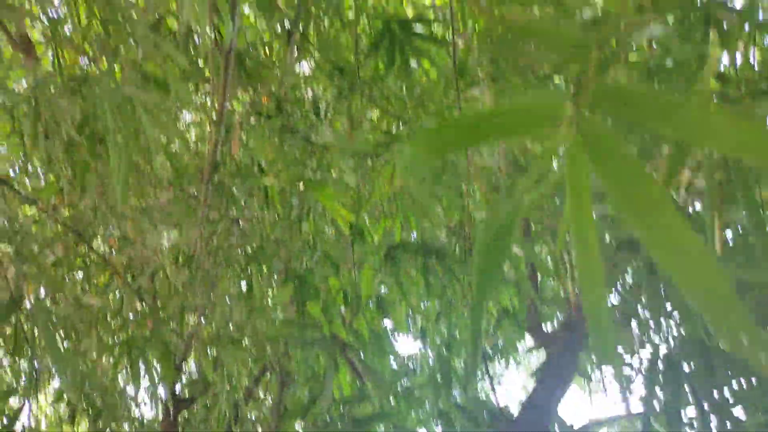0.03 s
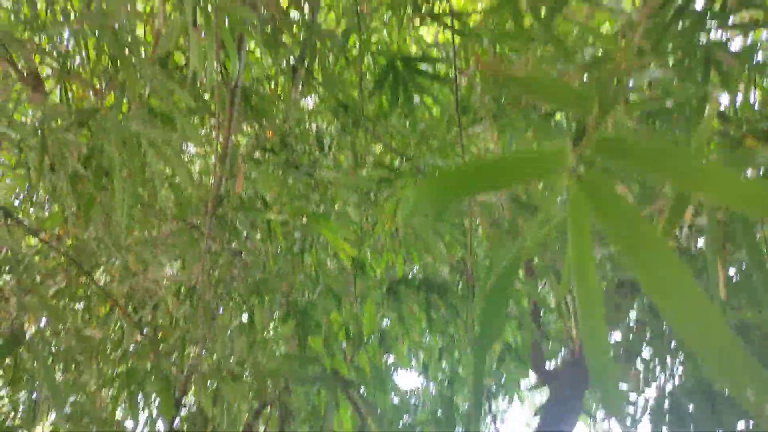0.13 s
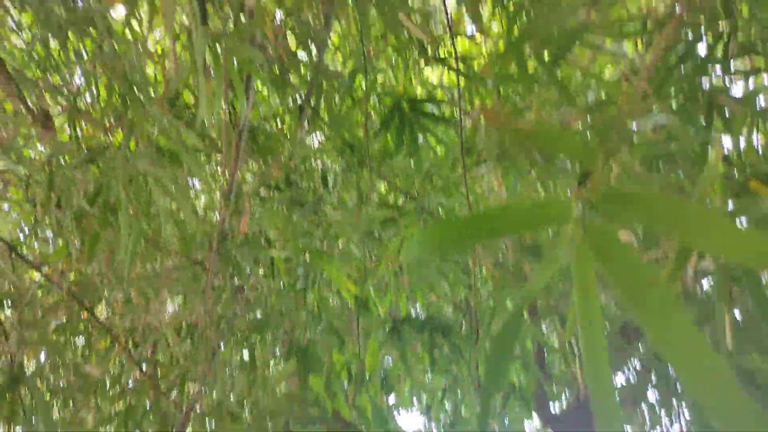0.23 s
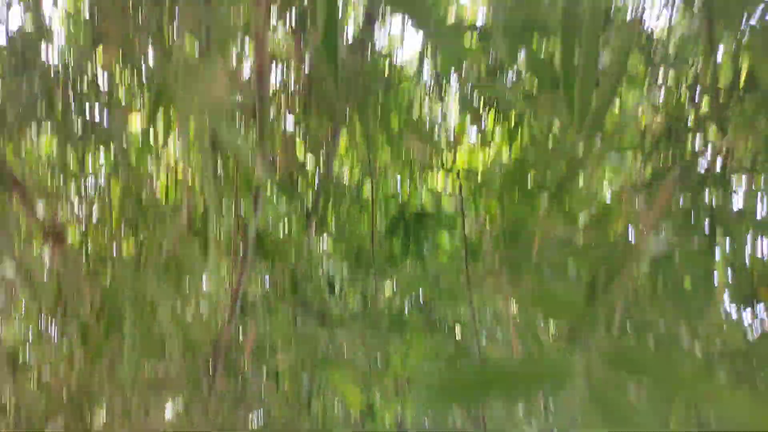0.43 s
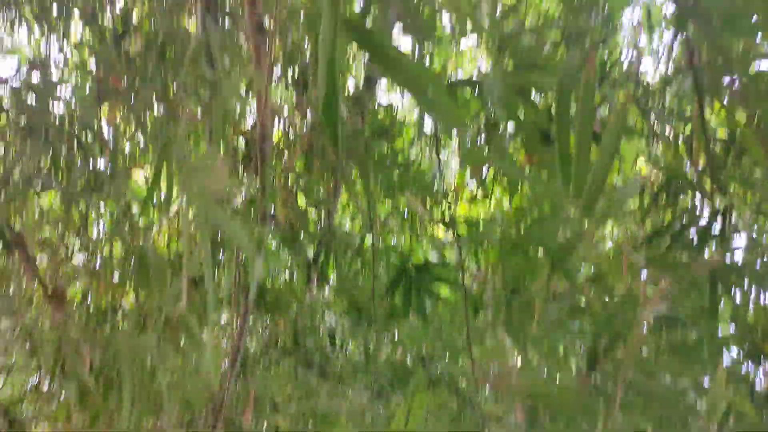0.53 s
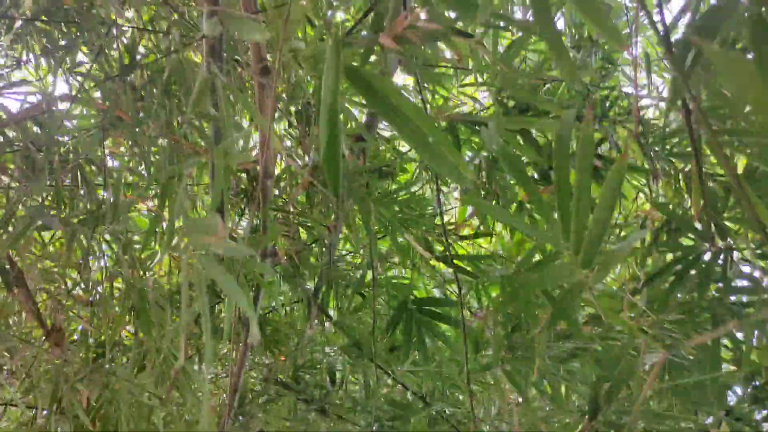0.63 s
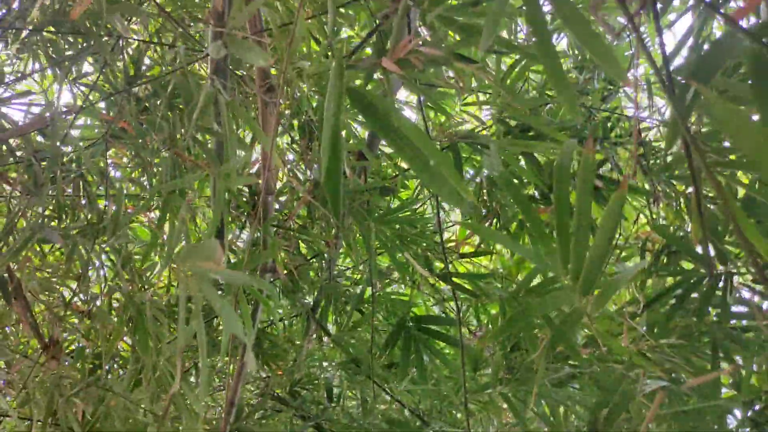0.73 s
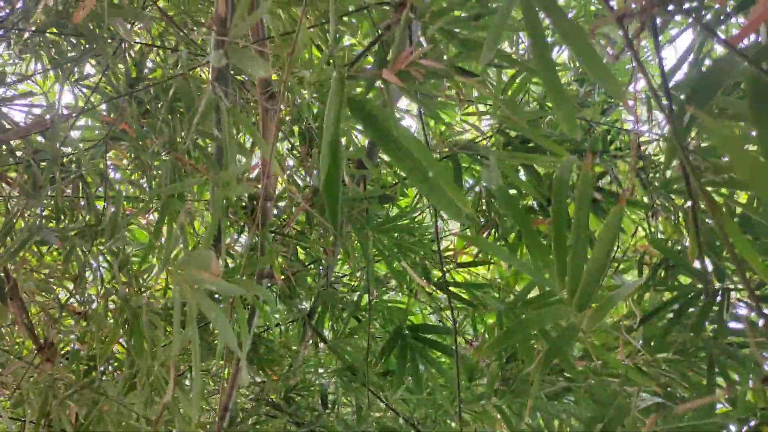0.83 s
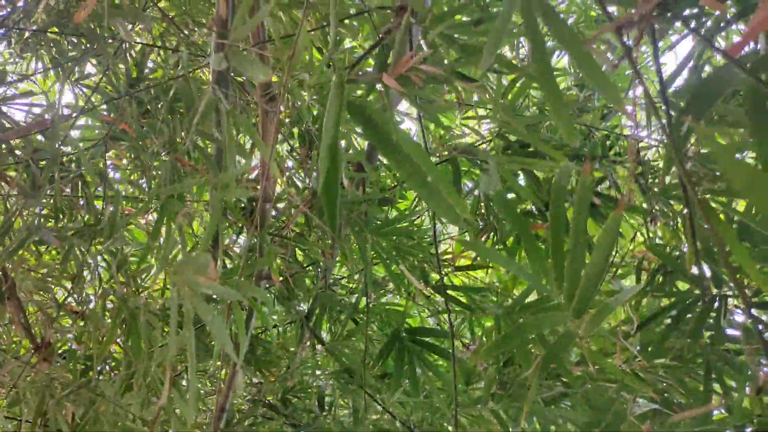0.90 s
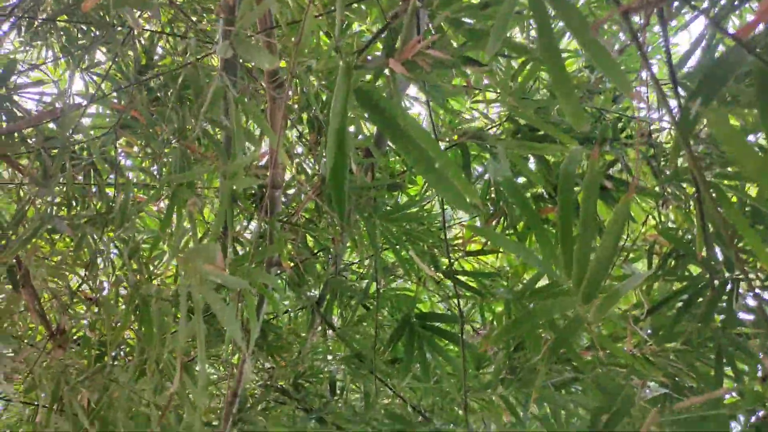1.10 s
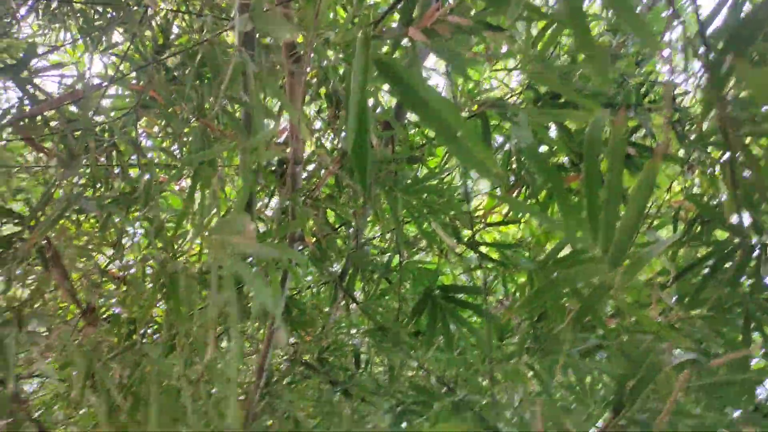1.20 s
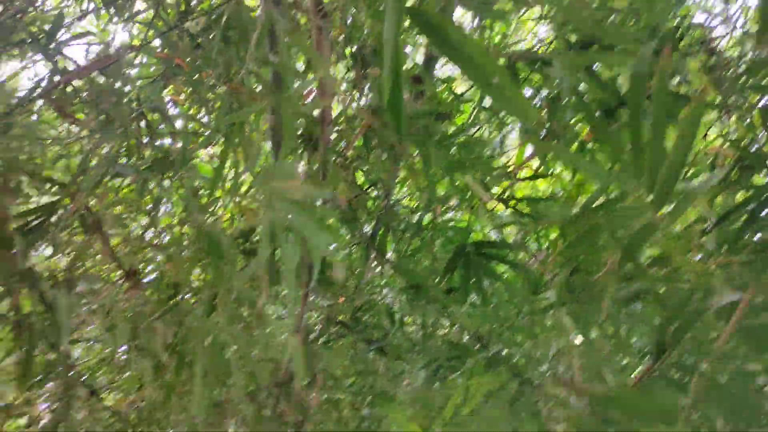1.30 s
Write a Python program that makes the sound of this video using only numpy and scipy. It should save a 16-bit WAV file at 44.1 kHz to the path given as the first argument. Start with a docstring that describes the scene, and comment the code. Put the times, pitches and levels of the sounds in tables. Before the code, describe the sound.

A soft rustle of leaves in a breeze, broken twice by a handled camera clicking.

```python
"""Bamboo leaves hiss as they brush together in a light wind, over a weak rumble and creaking stems.
A hand-held camera is tilted and its case knocks: a scuff, a soft thud, a hard click and a rattle of
contacts that ring its modes. The leaves swell and a faint low hum begins to come and go. As the hiss
sinks, a few dry leaves tick and the stems creak again. Then the case knocks a second time, and the
leaves swell once more and fade."""
import sys
import numpy as np
from scipy.fft import rfft, irfft, next_fast_len
from scipy.io import wavfile
from scipy.ndimage import map_coordinates

SR = 44100
rng = np.random.default_rng(int(sys.argv[2]) if len(sys.argv) > 2 else 0)


def master(y):
    """Save y as 16-bit WAV."""
    cut = np.clip(np.atleast_2d(y).T, -1, 1)
    pcm = np.round(cut * 32767)  # scale
    wavfile.write(sys.argv[1], SR, pcm.astype(np.int16))


N = 59535
T = np.arange(N) / SR


def amp(db):
    """The decibel scale: amplitude grows tenfold for every 20 dB."""
    return 10 ** (np.asarray(db) / 20)


def filtered(x, response):
    """Linear filtering: the spectrum of x is multiplied by a frequency response."""
    size = next_fast_len(N + 8192)
    return irfft(rfft(x, size) * response(np.fft.rfftfreq(size, 1 / SR)), size)[:N]


def noise(spectrum):
    """Spectral shaping: white noise takes on a (Hz, relative dB) colour and is scaled to rms 1."""
    knot_hz, db = np.transpose(spectrum)
    white = rng.standard_normal(N)
    coloured = filtered(white, lambda hz: amp(np.interp(np.log(hz + 1), np.log(knot_hz), db)))
    return coloured / coloured.std()


def curves(rows):
    """Linear interpolation: each column after the time becomes one value per sample."""
    times, *columns = np.transpose(rows)
    return [np.interp(T, times, column) for column in columns]


def envelope(start, length, rise, t60):
    """Exponential decay: a smooth onset is held until start + length, then falls 60 dB in t60 seconds."""
    age = np.maximum(T - start, 0)
    onset = 1 - np.exp(-(age / rise) ** 2.2)
    return onset * np.exp(-np.log(1000) * np.maximum(age - length, 0) / t60)


def pulse(start, length):
    """A raised-cosine window: one smooth push."""
    return np.sin(np.pi * np.clip((T - start) / length, 0, 1)) ** 2


def swells(rows, spectrum):
    """Amplitude modulation: coloured noise swells once for each row."""
    gain = sum(amp(db) * envelope(start, length, rise, t60) for start, length, db, rise, t60 in rows)
    return gain * noise(spectrum)


# The leaves' loudness, in four stretches. Each row: time in seconds, hiss and mid rustle levels in dB.
LEAF_LEVELS = [
    [(0.0, -46.5, -56.5), (0.024, -47.5, -54.5), (0.07, -50, -56), (0.15, -53.5, -59.5),
     (0.215, -46.5, -52.5)],
    [(0.29, -43.5, -48.5), (0.368, -48, -56), (0.668, -57.5, -64), (0.684, -60, -68), (0.72, -62, -78)],
    [(0.78, -61, -86.5), (0.782, -60, -86.5), (0.818, -59.5, -85), (0.836, -55.5, -66.5), (0.93, -46, -53)],
    [(1.05, -45, -51), (1.228, -57, -62.5), (1.242, -60, -66.5), (1.25, -59, -66.5), (1.35, -61.5, -80)],
]
# The loudness of their lowest band. Each row: time in seconds, level in dB.
LOW_RUSTLE_LEVELS = [(0, -66.5), (.1, -66), (.15, -90), (.21, -62.5), (.25, -55), (.3, -54), (.38, -61),
                     (.5, -65.5), (.62, -92), (.67, -76), (.73, -93), (.82, -88), (.87, -65.5), (.93, -59),
                     (1.02, -56.5), (1.12, -59.5), (1.22, -71.5), (1.3, -98.5)]
# The spectra of the three bands. Each row: frequency in Hz, relative level in dB.
HISS_SPECTRUM = [(3000, -47), (4100, -9.5), (5000, -3.5), (5500, -1.5), (6100, -6), (6900, 0), (7450, 1.5),
                 (7750, -5), (8000, -18.5), (8300, -18.5), (8600, -40.5)]
MID_RUSTLE_SPECTRUM = [(1750, -48.5), (2050, -17.5), (2300, -3), (2800, 3.5), (3400, 0.5), (4000, -2),
                       (4800, -27), (6000, -40)]
LOW_RUSTLE_SPECTRUM = [(950, -57.5), (1150, -19), (1350, -9.5), (1630, -4.5), (1930, -6), (2400, -3),
                       (3200, -52.5)]
def leaves(flutter_db=1.14, knots_per_s=260):
    """Friction noise: leaves brush each other, giving three bands that share one fast random grain."""
    hiss_db, mid_db = curves(np.vstack(LEAF_LEVELS))
    low_db, = curves(LOW_RUSTLE_LEVELS)
    hiss = amp(hiss_db) * noise(HISS_SPECTRUM)
    mid = amp(mid_db) * noise(MID_RUSTLE_SPECTRUM)
    low = amp(low_db) * noise(LOW_RUSTLE_SPECTRUM)
    grain = map_coordinates(rng.standard_normal(N), [T * knots_per_s])  # smooth random curve
    return (hiss + mid + low) * amp(flutter_db * grain)


# Swells of the rumble. Each row: start and length in seconds, level in dB, rise and t60 in seconds.
RUMBLE_SWELLS = [(-.02, 0.043, -62, 0.011, .55), (.985, 0.032, -63, 0.0091, .2),
                 (1.3, .05, -63.5, 0.0098, .2)]
# The spectra of the rumble and the steady floor. Each row: frequency in Hz, relative level in dB.
RUMBLE_SPECTRUM = [(20, -23), (55, -14), (90, 1), (135, -5.5), (200, -15.5), (400, -55), (900, -73.5)]
FLOOR_SPECTRUM = [(20, -9), (80, 2.5), (160, -6.5), (350, -8), (600, -17.5), (2000, -23), (8000, -26)]
def rumble(floor_db=-77.5):
    """Low-frequency noise: a weak band near 90 Hz swells three times over a stationary floor."""
    return swells(RUMBLE_SWELLS, RUMBLE_SPECTRUM) + amp(floor_db) * noise(FLOOR_SPECTRUM)


# Creaks of the stems. Each row: start and length in seconds, pitch in Hz,
# half-width as a share of the pitch, level in dB.
STEM_CREAKS = [(-.01, 0.083, 1070, .22, -70), (-.01, .19, 1563, 0.15, -71),
               (0.546, 0.0034, 1690, 0.094, -65.5), (0.633, 0.0042, 1410, .15, -59.5),
               (0.656, 0.042, 1350, .18, -77), (0.756, 0.047, 1254, 0.18, -79),
               (0.833, 0.0098, 1580, .12, -71), (1.232, 0.051, 1750, 0.086, -75.5)]
def creaks(rise_s=0.0024, t60_s=0.073):
    """Resonance driven by friction: stems rub together and sound one narrow band of noise each."""
    out = np.zeros(N)
    for start, length, pitch, width, db in STEM_CREAKS:
        friction = rng.standard_normal(N)
        band = filtered(friction, lambda hz: 1 / (1 + ((hz / pitch - 1) / width) ** 2) ** 2)
        out += amp(db) * envelope(start, length, rise_s, t60_s) * band / band.std()
    return out


# Scuffs of the case. Each row: start and length in seconds, level in dB, rise and t60 in seconds.
CASE_SCUFFS = [(.222, 0.047, -56, 0.0044, 0.28), (.89, 0.099, -58.5, 0.032, 0.35),
               (.988, 0.0081, -54, 0.002, 0.21), (1.04, .05, -66.5, 0.0185, .2)]
# The spectrum of a scuff. Each row: frequency in Hz, relative level in dB.
SCUFF_SPECTRUM = [(100, -23.5), (300, -3), (520, -4.5), (720, 4.5), (1000, -2.5), (1400, -1.5), (2500, -36)]
def scuffs():
    """Sliding friction: the handled case gives short swells of noise around each knock."""
    return swells(CASE_SCUFFS, SCUFF_SPECTRUM)


# The hollow low note of the case. Each row: start in seconds, level in dB.
CASE_THUDS = [(0.223, -50), (0.987, -61.5)]
def thuds(pitch_hz=350, hold_s=0.024, rise_s=0.0097, t60_s=0.11):
    """Body resonance: the case booms softly in one damped mode under each rattle."""
    out = np.zeros(N)
    for start, db in CASE_THUDS:
        tone = np.sin(2 * np.pi * pitch_hz * (T - start))
        out += amp(db) * envelope(start, hold_s, rise_s, t60_s) * tone
    return out


# The modes of the case. Each row: frequency in Hz at pitch ratio 1, relative level in dB, t60 in seconds.
CASE_MODES = [(1756, -27, 0.019), (2000, -25.5, 0.1), (2340, -20, 0.016), (2603, -11.5, 0.092),
              (2977, -20.5, 0.044), (3060, -28.5, .05), (3260, -23, 0.045), (4600, -38.5, .015)]
def case_ring(start, pitch_ratio, rise_s=0.00061):
    """Modal vibration: the struck case rings as a sum of damped sinusoids of random phase."""
    out = np.zeros(N)
    for hz, db, t60 in CASE_MODES:
        phase = 2 * np.pi * hz * pitch_ratio * (T - start) + rng.uniform(0, 2 * np.pi)
        out += amp(db) * envelope(start, 0, rise_s, t60) * np.sin(phase)
    return out


# Contacts of the case. Each row: start in seconds, level in dB, pitch ratio,
# then the relative levels of ring, rasp and snap in dB.
CASE_CONTACTS = [(0.2252, -9.5, 1, -2, -23.5, -23), (0.243, -12, 1.002, -4, -24, -16.5),
                 (0.2484, -31.5, 0.68, 3, -1, -24), (0.2536, -24.5, .98, 2, -9, -18),
                 (0.9568, -10.5, 1.02, 1, -19, -12), (.9598, -26.5, 1.27, -7, -1, -0.5),
                 (0.9916, -18, 1.046, 5, -8.5, -14.5), (0.9971, -22.5, 1, 1, -4, -10),
                 (1.0005, -19, 1, 4, -19.5, -22), (1.0085, -29, 1, 5.5, -5, -12.5),
                 (1.0291, -32.5, .98, 3.5, -12, -16)]
# The spectra of a contact's snap, rasp and tail. Each row: frequency in Hz, relative level in dB.
SNAP_SPECTRUM = [(1500, -29), (2000, -11), (2500, -9), (3200, 1), (4400, 1), (5200, -14.5), (7000, -23.5),
                 (8400, -40)]
RASP_SPECTRUM = [(600, -37.5), (1300, -18), (1750, -1.5), (2250, -15.5), (2700, -3.5), (3350, 1.5),
                 (3750, -5), (4050, 0), (4450, 0), (5100, -6), (6100, -5.5), (6950, 2), (7650, -6.5),
                 (8100, -23), (8600, -35.5)]
TAIL_SPECTRUM = [(1900, -44.5), (2300, -18), (2480, -1), (2640, -5), (2800, -7), (2980, 3.5), (3150, -19.5),
                 (4000, -37)]
def knocks(click_hz=2690, click_s=0.0036, snap_s=0.0022, rasp_trim_db=-2, tail_db=-24):
    """Impact excitation: each contact clicks, snaps, rings the case, rasps and leaves a diffuse tail."""
    out = np.zeros(N)
    for start, db, pitch_ratio, ring_db, rasp_db, snap_db in CASE_CONTACTS:
        click = pulse(start, click_s) * np.sin(2 * np.pi * click_hz * pitch_ratio * (T - start))
        snap = amp(snap_db) * pulse(start, snap_s) * noise(SNAP_SPECTRUM)
        ring = amp(ring_db) * case_ring(start, pitch_ratio)
        decay = envelope(start, length=0, rise=0.0015, t60=0.1)
        rasp = amp(rasp_db + rasp_trim_db) * decay * noise(RASP_SPECTRUM)
        tail = amp(tail_db) * decay * noise(TAIL_SPECTRUM)
        out += amp(db) * (click + snap + ring + rasp + tail)
    return out


# Swells of the hum. Each row: start and length in seconds, level in dB, rise and t60 in seconds.
HUM_SWELLS = [(.27, 0.02, -61.5, 0.016, 0.25), (.715, .075, -67.5, 0.0099, 0.71),
              (.89, .04, -72.5, .02, .3), (.988, 0.0084, -60, 0.0066, 0.4), (1.1, 0.076, -63, 0.026, 0.51)]
# The spectrum of the hum. Each row: frequency in Hz, relative level in dB.
HUM_SPECTRUM = [(220, -51.5), (290, -10), (325, -6.5), (390, -5.5), (430, -15.5), (560, -40), (900, -65.5)]
def hum():
    """Narrow-band noise: energy gathered near 350 Hz is heard as a faint hum that comes and goes."""
    return swells(HUM_SWELLS, HUM_SPECTRUM)


# Ticks of single leaves. Each row: start in seconds, level in dB, t60 in seconds.
LEAF_TICKS = [(.5835, -43, .035), (.6375, -39, .02), (.7628, -53, .015), (.7858, -53, .015),
              (.863, -47, .015)]
# The spectrum of a tick. Each row: frequency in Hz, relative level in dB.
TICK_SPECTRUM = [(1000, -42), (1500, -20), (2600, -7), (4000, -10), (5200, -11.5), (6400, 3.5), (7400, 4.5),
                 (8100, -15), (8600, -50)]
def ticks(rise_s=0.001):
    """Impact transients: a dry leaf flicks against a stem and gives a bright, quickly damped burst."""
    bursts = sum(amp(db) * envelope(start, 0, rise_s, t60) for start, db, t60 in LEAF_TICKS)
    return bursts * noise(TICK_SPECTRUM)


def scene():
    """Superposition: the bamboo, the handled case and the low background add in one channel."""
    return (leaves() + rumble() + creaks() + scuffs() + thuds() + knocks() + hum() + ticks())[None]


def record(dry):
    """Low-pass filtering: the camera cuts off steeply above its band limit."""
    limit_hz = 8400
    return filtered(dry[0], lambda hz: 1 / (1 + (hz / limit_hz) ** 120))[None]


dry = scene()
out = record(dry)
master(out)
```